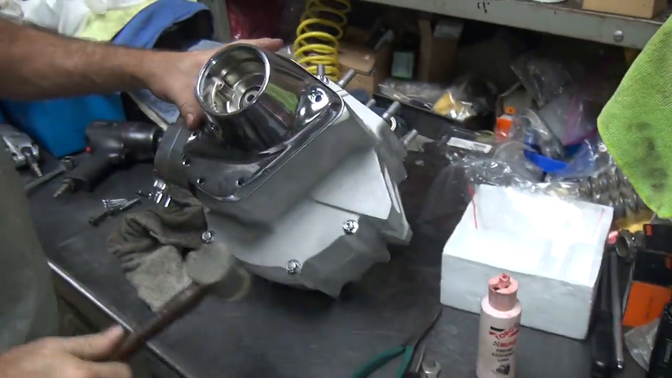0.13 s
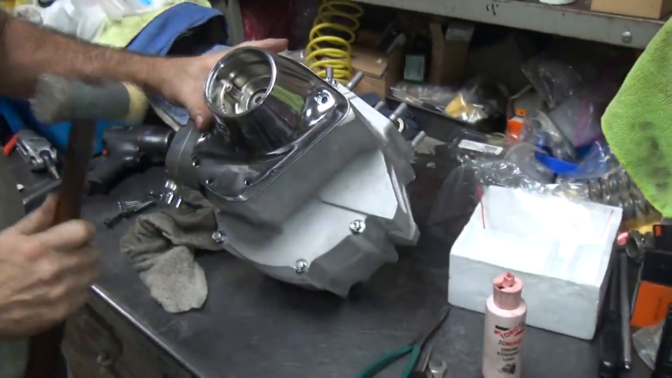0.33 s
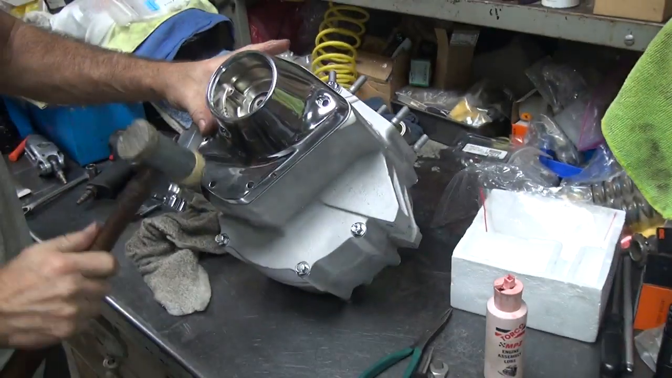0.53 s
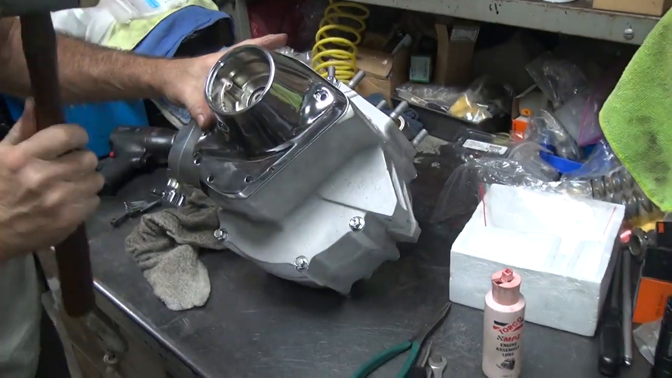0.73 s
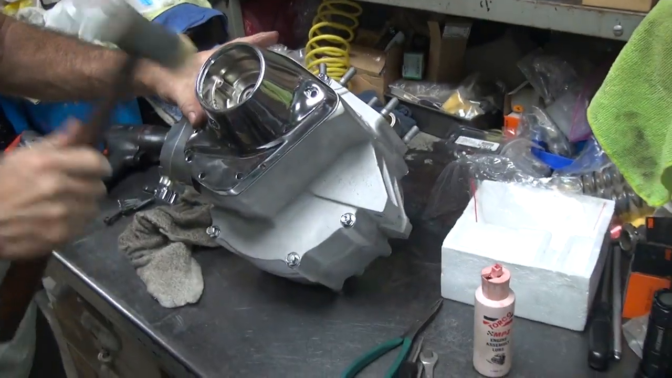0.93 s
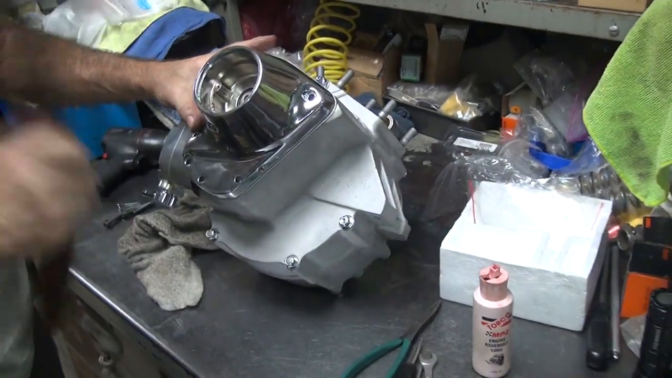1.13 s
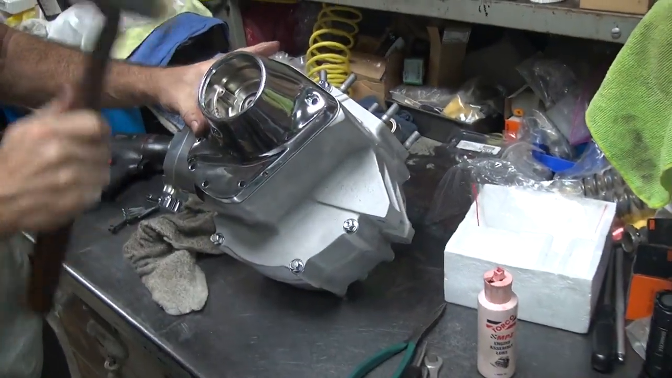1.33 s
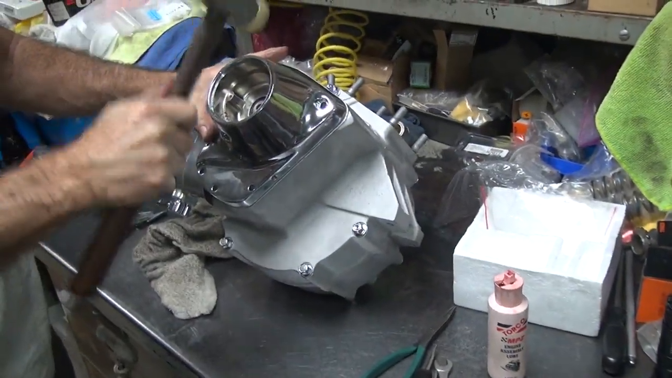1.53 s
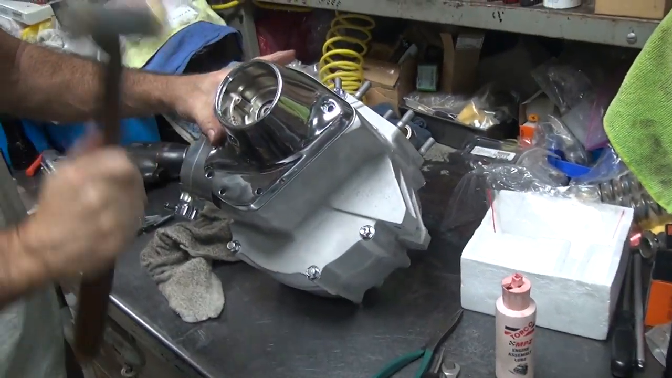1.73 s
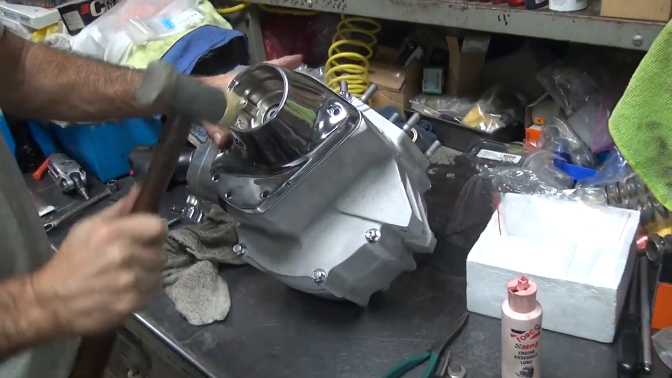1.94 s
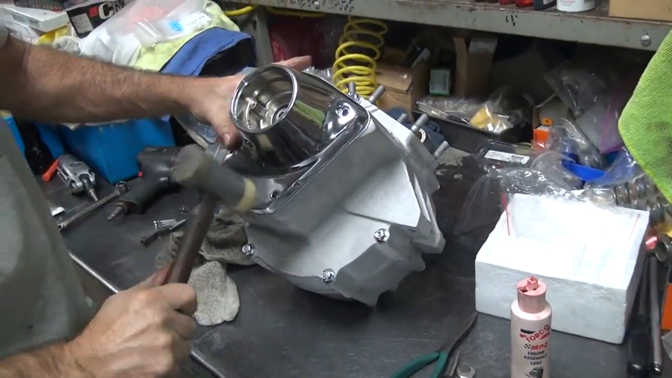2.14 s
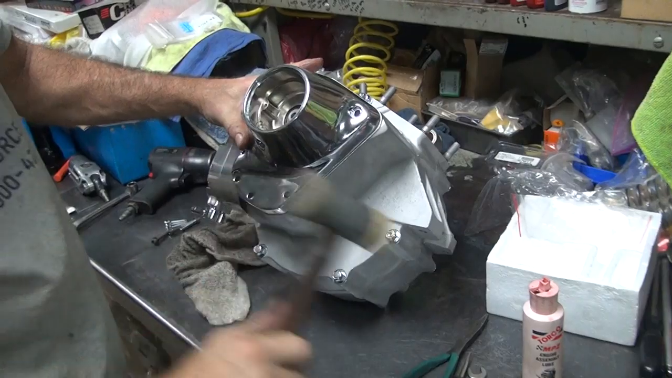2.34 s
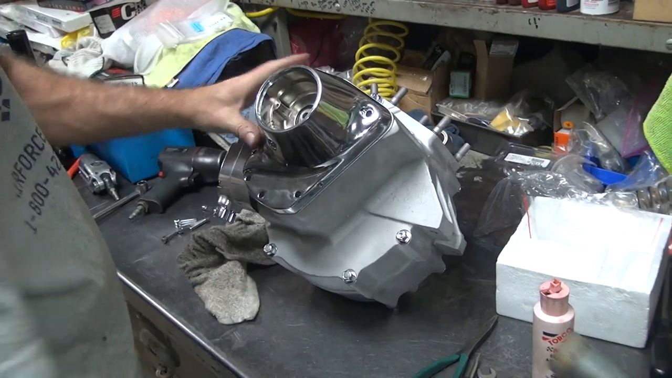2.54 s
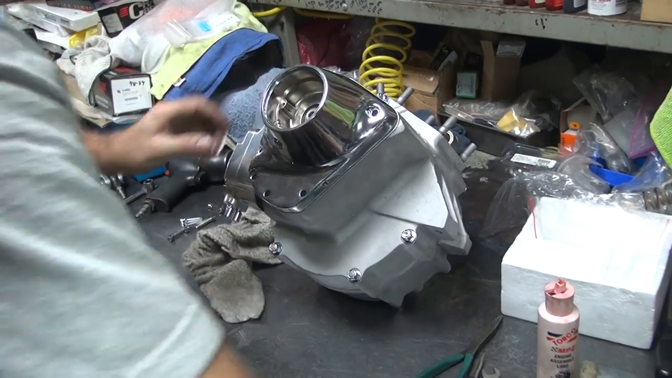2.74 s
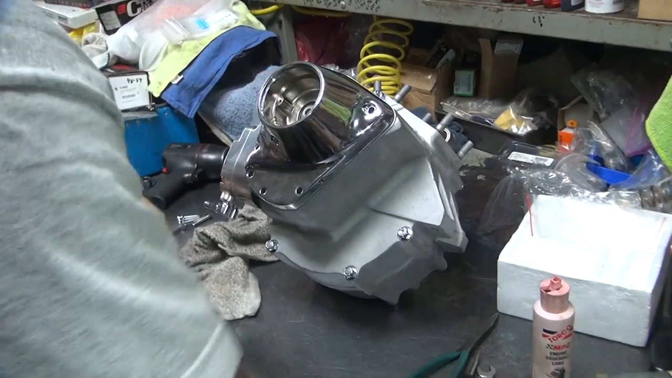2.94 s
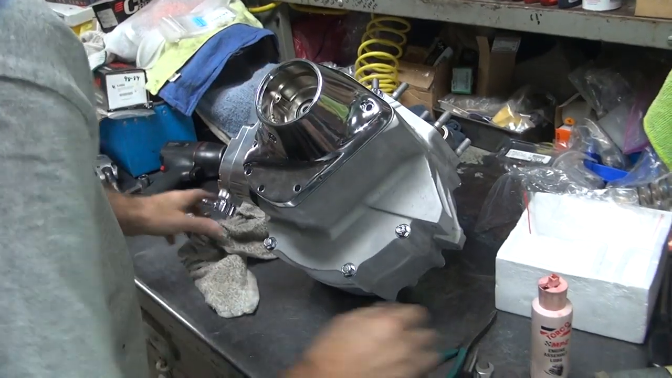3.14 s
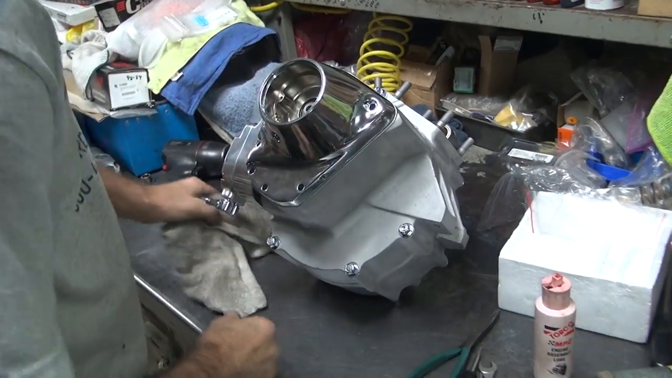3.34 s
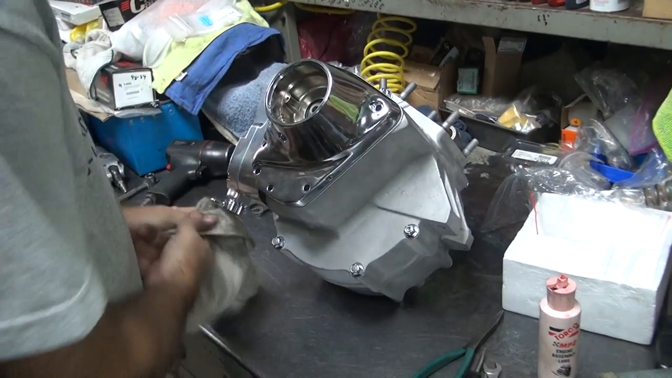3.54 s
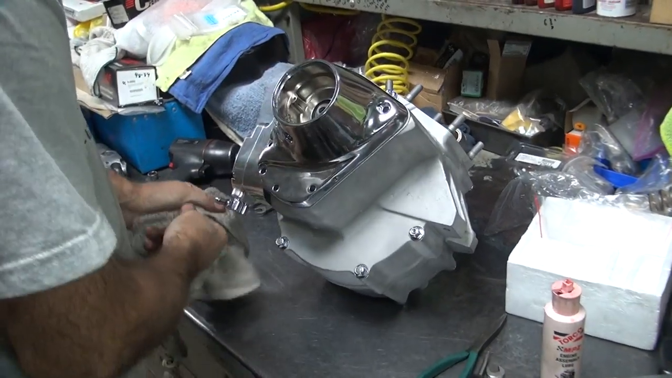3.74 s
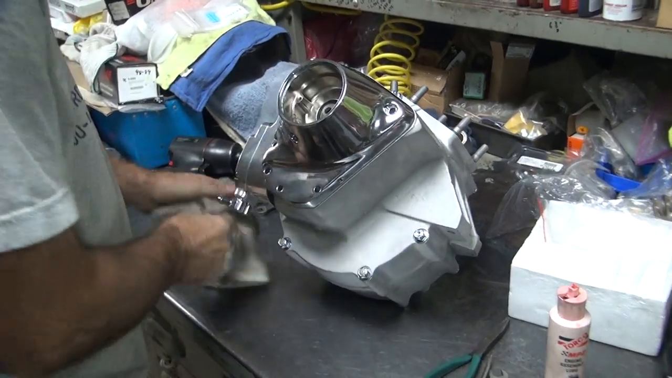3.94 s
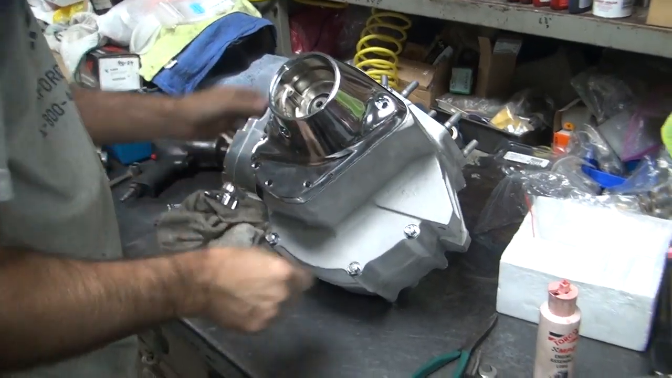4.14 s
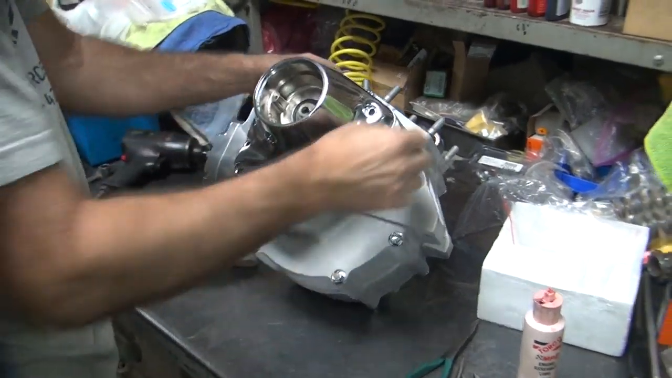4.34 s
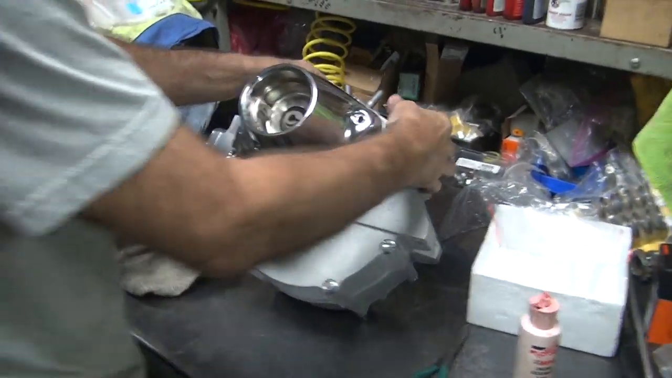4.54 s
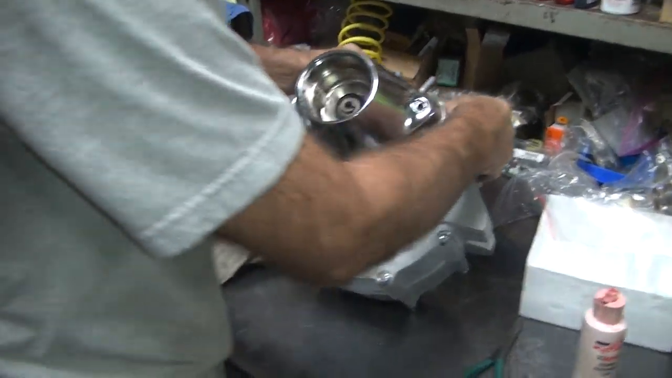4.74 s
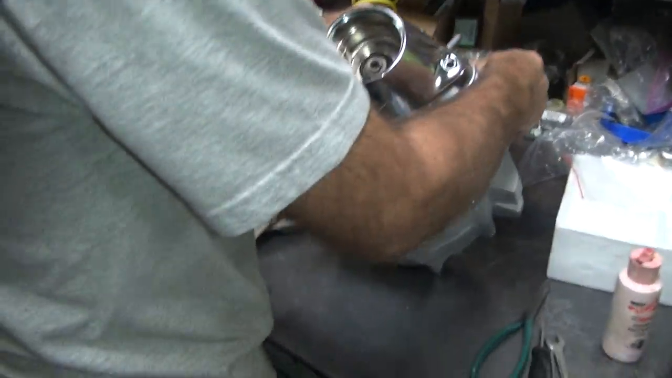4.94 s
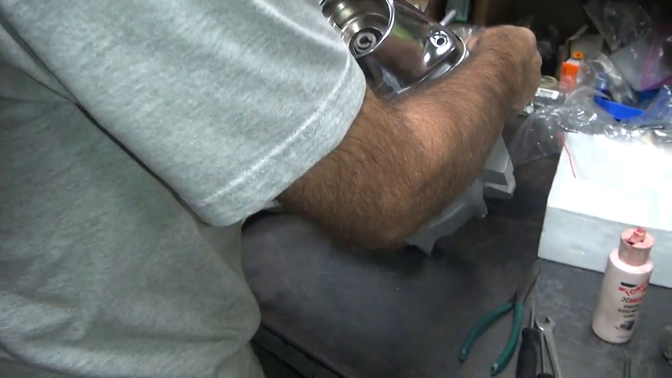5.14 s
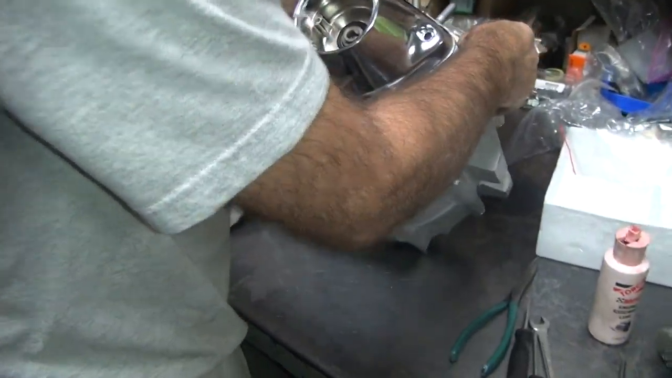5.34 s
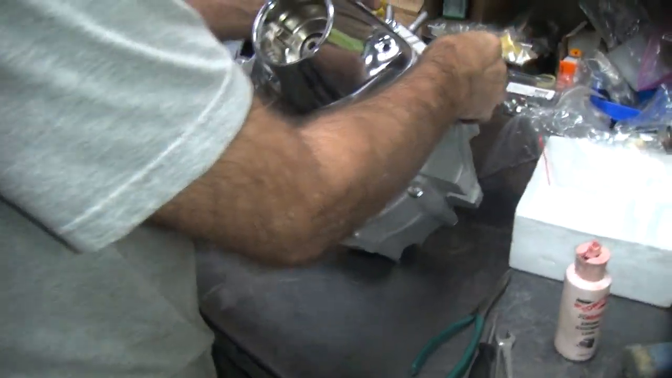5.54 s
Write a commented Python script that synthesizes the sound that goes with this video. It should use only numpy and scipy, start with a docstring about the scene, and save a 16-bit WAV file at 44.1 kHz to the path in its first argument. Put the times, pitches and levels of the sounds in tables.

```python
"""A motorcycle crankcase slides on a steel bench in a small workshop, with light hand taps, hiss and ticks.
Six mallet blows then tap a metal cover onto it: noise and fading sine tones make the thud, clang and ping.
After a few faint gliding chirps the mallet drops among loose tools, which rattle and ring on.
Hands wipe on a rag (hiss that swells and fades), then take hold of the case and rock it with knocks and clinks.
Air and mains hum run throughout; a limiter flattens every loud blow, so the room swells up just behind it."""
import sys
import numpy as np
from scipy import signal
from scipy.fft import rfft, irfft, next_fast_len
from scipy.io import wavfile
from scipy.ndimage import uniform_filter1d, minimum_filter1d

SR = 44100
rng = np.random.default_rng(int(sys.argv[2]) if len(sys.argv) > 2 else 0)


def int16_out(signal):
    """Quantize to a 16-bit WAV file."""
    q = np.round(np.clip(np.atleast_2d(signal).T, -1, 1) * 32767)
    wavfile.write(sys.argv[1], SR, q.astype(np.int16))


N = 246607

# All dB values are relative strengths. A t60 is the time a sound takes to fade by 60 dB.
# steady workshop air: (frequency [Hz], strength per Hz [dB])
AIR_COLOUR = [(18, -26.5), (30, 2), (118, 1), (165, 0), (295, 0), (486, -10), (1160, -11), (2060, -17),
              (2350, -17), (6380, -20), (16000, -26)]
AIR_DB = -67.5
# mains hum: (frequency [Hz], level [dB])
HUM = [(60, -94.5), (120, -79)]

# loudness of the case sliding on the bench, before it stops: (time [s], level [dB])
SLIDE_LEVEL = [(0, -52.5), (.05, -55), (.16, -60.5), (.26, -57), (.3, -55.5)]
# tone of that scraping: (frequency [Hz], strength per Hz [dB])
SLIDE_COLOUR = [(80, -6), (400, 7), (900, 3), (1550, -5.5), (1950, 9.5), (2600, -1.5), (4100, 1.5),
                (5000, -3), (10000, -1.5), (16000, -10.5)]
SLIDE_STOP_S, SLIDE_RELEASE_S = 0.28, 0.038

# strokes of sleeve, rag and palm; the length runs between the points where speed is 37% of its peak:
# (time of fastest motion [s], length [s], level [dB], brightness [dB])
STROKES = [(0.412, 0.75, -68, -2.5), (2.89, 0.56, -63, -6), (3.19, 0.25, -67.5, -4), (3.646, 0.11, -76, 6),
           (3.864, 0.21, -72, 9), (4.096, 0.2, -64, -15), (4.27, 0.17, -58.5, -6), (4.46, .12, -63.5, -3),
           (4.635, 0.21, -68, 5), (4.884, 0.23, -59.5, -12.5), (5.19, .22, -60, -18), (5.47, 0.4, -68, -5)]
# tone of the stroking hiss: (frequency [Hz], strength per Hz [dB])
RUSTLE_COLOUR = [(80, -30.5), (400, 9), (900, 4), (1600, 2), (2000, 2), (2600, -2.5), (4500, -2.5),
                 (7000, -1.5), (10000, -3), (16000, -3.5)]
SWELL_SHAPE = 1.42  # a stroke gathers and loses speed in a bell: 1 = pointed, 2 = round

# workshop echo, t60 before the length factor: (frequency [Hz], strength [dB], t60 [s])
ROOM = [(60, -1.5, 0.35), (247, 0.5, 0.53), (930, -6, 0.52), (2910, -1, 0.42), (6940, 2, 0.3),
        (15000, 8.5, 0.19)]

# light dry taps of hands on the cover: (time [s], force [dB])
TAPS = [(0.026, -37.5), (0.219, -42.5), (4.002, -45.5), (4.81, -43.5), (5.121, -44)]
# small ticks of the grip and loose parts: (time [s], force [dB], crack [dB])
TICKS = [(0.379, -48.5, -13), (0.393, -51.5, -9), (0.473, -54.5, -15.5), (2.674, -50.5, -18),
         (2.707, -46, -14.5), (3.611, -60, -8), (4.196, -45.5, -14), (4.202, -42.5, -14),
         (4.21, -40.5, -9.5), (4.219, -44.5, -11.5), (5.12, -62.5, -7)]
# the case knocking on the bench: (time [s], force [dB], hardness [dB], thump of the edge that lands [Hz])
KNOCKS = [(4.2287, -27.5, 1, 172), (4.241, -29, -14, 180), (4.256, -34, 5, 300), (4.323, -40, -8, 283),
          (4.430, -29.5, -1, 224), (4.468, -32, -9.5, 225), (4.481, -34, 2, 241), (4.527, -50, 4, 260),
          (5.327, -40, -8, 200), (5.402, -36.5, 3.5, 221)]
# metal clinks as the case is tipped: (time [s], force [dB], thud [dB], crack [dB])
CLINKS = [(5.3433, -34.5, 2, 2.5), (5.558, -44, 11, -10)]
# six mallet blows: (time [s], force [dB], thud [dB], clang [dB], crack [dB],
# ring length factor [1], ping of the spot struck [Hz], ping level [dB])
BLOWS = [(0.5449, -19.5, -6.5, -2, -1.5, 1.17, 1060, 1), (0.9090, -12.5, 1, 2, 3, 0.94, 436, 11.5),
         (1.2592, -13.5, -1, -2, 4, 1.036, 1000, 5), (1.584, -14, 0, -1.5, 5, 0.88, 3090, -1.5),
         (1.8672, -13.5, -0.5, -7.5, 1, 0.81, 3010, 1), (2.1717, -22.5, 3.5, 2, 5, 0.7, 2990, 2)]
# the dropped mallet bouncing among tools: (time [s], force [dB], thud [dB], crack [dB])
CLATTER = [(2.918, -14.5, 3.5, 1.5), (2.946, -31, -2, 13), (2.979, -7.5, 3, -8), (2.984, -10.5, -1.5, 4),
           (3.004, -7.5, -1.5, 2.5), (3.032, -23.5, 10, 9.5), (3.0825, -17.5, -1, 2.5),
           (3.114, -20, 0.5, -1.5), (3.13, -30, 1, -8), (3.159, -28, -10, -9)]

# The next six describe the dense ringing of each struck thing, t60 before the length factor.
# hand-tapped cover: (frequency [Hz], strength per Hz [dB], t60 [s])
TAP_BODY = [(81, -5.5, .04), (252, 5, 0.04), (480, 3.5, 0.058), (990, -8.5, 0.021), (2200, -14, .04),
            (4500, -31, 0.034), (13000, -46, .02)]
# small loose parts: (frequency [Hz], strength per Hz [dB], t60 [s])
SMALL_BODY = [(40, -33, 0.034), (200, -2, 0.033), (1015, -13, .03), (3040, -1.5, 0.019),
              (7130, -0.5, 0.026), (15100, -6.5, .02)]
# bench under a knock: (frequency [Hz], strength per Hz [dB], t60 [s])
BENCH_BODY = [(30, -34, 0.027), (59.7, -30, 0.11), (126, -11.5, 0.041), (185.4, 6.5, 0.038),
              (330, -3, 0.29), (550, -14, 0.13), (930, -23.5, 0.25), (2000, -28, 0.091),
              (5000, -41.5, 0.13), (15000, -57, 0.019)]
# clinking metal rim: (frequency [Hz], strength per Hz [dB], t60 [s])
RIM_BODY = [(80, -14, 0.35), (333, 2.5, 0.16), (980, 2, 0.18), (1860, 1.5, 0.25), (3360, -11, 0.069),
            (5560, -8, 0.022), (15000, -25, 0.038)]
# case under the mallet: (frequency [Hz], strength per Hz [dB], t60 [s])
CASE_BODY = [(50, -4, 0.18), (164, 2, 0.12), (318, 6, 0.11), (510, -0.5, 0.34), (617, -5.5, 0.22),
             (857, 4, 0.24), (1410, 0.5, 0.23), (2480, -3, 0.19), (3550, -9.5, 0.2), (6400, -9, 0.17),
             (9500, -15.5, 0.13), (12100, -21, 0.15), (17000, -37.5, 0.2)]
# rattling tools: (frequency [Hz], strength per Hz [dB], t60 [s])
TOOLS_BODY = [(51.4, -11.5, 0.075), (162, -3, 0.29), (310, -2, 0.42), (635, -2.5, 0.22), (1100, -2.5, 0.33),
              (2020, -4.5, 0.31), (3510, -8, 0.32), (5360, 0.5, 0.082), (8700, -9, 0.17),
              (12200, -17, 0.12), (16000, -25.5, 0.085)]

# The next five are modes: single tones at which a thing likes to ring.
# case, before the blow's own level and length changes: (frequency [Hz], level [dB], t60 [s])
CASE_MODES = [(285.3, -20.5, 0.19), (326, -17.5, 0.11), (421, -14, 0.47), (427, -12, 0.22),
              (497, -13, 0.33), (527.5, -14.5, 0.096), (659, -17.5, 0.37), (830, -16, 0.29),
              (869, -29, 0.72), (954, -10.5, 0.31), (1072, -33.5, 0.52), (1095, -21, 0.63),
              (1340, -11.5, 0.38), (2030, -19.5, 0.34), (2210, -24.5, 0.35)]
# case knocking on the bench: (frequency [Hz], level [dB], t60 [s])
KNOCK_MODES = [(222, -21, 0.065), (277, -7.5, 0.13), (322.3, -12, 0.23), (467, -16.5, 0.073)]
# clinking rim: (frequency [Hz], level [dB], t60 [s])
RIM_MODES = [(1106, -7.5, 0.13), (1298, -9, 0.12), (1700, -26, 0.33), (1836, -8, 0.24), (2020, -18.5, .28),
             (2410, -18, 0.059)]
# steel bench: (frequency [Hz], level [dB], t60 [s])
BENCH_MODES = [(59.7, -39, 1.9), (104.9, -20, 0.31), (108.6, -44, 2.8), (118.7, -42, 2.8),
               (122.3, -37.5, 5), (147.5, -30, 0.52), (174, -24.5, 0.57), (205, -29, 0.45)]
# tools under the dropped mallet: (frequency [Hz], level [dB], t60 [s])
TOOL_MODES = [(60, -30, 0.59), (85.8, -16.5, 0.4), (121, -31.5, 0.5), (193.7, -23, 0.96),
              (283.7, -11, 0.34), (305, -21, 0.35), (443.4, -14.5, 0.272), (820, -24, 0.72),
              (940, -29, 0.36), (1150, -48, 1.9), (2067, -32.5, 1.13)]

# faint chirps and squeaks: (time [s], duration [s], start frequency [Hz], end frequency [Hz], level [dB])
CHIRPS = [(2.405, .022, 1000, 1150, -63), (2.552, .022, 1050, 1250, -65), (2.620, .018, 1720, 1660, -70),
          (2.70, .21, 5950, 6700, -79)]
# reverberation that differs between the microphones: (frequency [Hz], strength [dB])
WIDTH = [(40, -1), (120, 2), (500, -1.5), (2000, -1.5), (4500, -4), (8000, 8), (10500, 2.5), (13000, -14)]
# the left microphone is thinner in the bass: (frequency [Hz], gain [dB])
LEFT_PORT = [(25, -2), (60, -3), (125, 0.7), (250, 0)]

CONTACT_DB, CONTACT_PER_FORCE = -30.5, -1.73  # a light blow is mostly contact click, a heavy one mostly ring
LOW_MODES_DB, LOW_PER_THUD = -3, 0.96  # the low modes follow the thud
HIGH_MODES_DB, HIGH_PER_CLANG = -4.5, 1.3  # the high modes follow the clang
PING_T60_S = 0.033  # the metal right under the mallet rings only briefly
THUMP_DB, THUMP_T60_S = -3.5, 0.06
BENCH_DB, BENCH_PER_THUD = 3.5, 0.3  # so much of a blow reaches the bench
LAST_RING, SETTLE_S = 0.27, 0.052  # the bounces ring ever shorter, towards this share of the first
HOLD_S, RELEASE_DB_PER_S = 0.005, 800  # limiter: window centred on each peak, then speed of recovery
EDGE_HZ = 16300  # top of the band


def amp(db):
    """Turns decibels into a plain multiplier."""
    return 10 ** (np.asarray(db) / 20)


def unit(x):
    """Scales a signal to an average (rms) strength of 1."""
    return x / np.sqrt(np.mean(x ** 2) + 1e-20)


def read(points, hz, axis=1):
    """Reads one column of a table at any frequency, joining its points on a log-frequency axis."""
    columns = np.transpose(points)
    return np.interp(np.log(hz + 1), np.log(columns[0] + 1), columns[axis])


def add(mix, s, sound):
    """Mixes a sound in at time s."""
    part = mix[max(round(s * SR), 0):][:len(sound)]
    part += sound[:len(part)]


def colour(x, *spectra):
    """Filters x with the first spectrum, scaled to keep mean power, then tilts it by any others."""
    size = next_fast_len(len(x), real=True)
    hz = np.fft.rfftfreq(size, 1 / SR)
    tilt_db = sum(read(points, hz) for points in spectra[1:])
    gain = unit(amp(read(spectra[0], hz))) * amp(tilt_db)
    cepstrum = irfft(np.log(gain + 1e-6), size)
    cepstrum[1:] *= 2 * (np.arange(1, size) < size / 2)  # minimum phase: nothing sounds before its cause
    response = np.exp(rfft(cepstrum))
    return irfft(rfft(x, size) * response, size)[:len(x)]


def fade(x, table, length=1):
    """Lets each frequency band die away at its own t60, times the length factor."""
    hz, t, bands = signal.stft(x, SR, nperseg=256)
    t60 = np.maximum(read(table, hz, axis=2) * length, 1e-3)[:, None]
    decay = np.exp(-np.log(1000) * t / t60)
    return signal.istft(bands * decay, SR, nperseg=256)[1][:len(x)]


def ring(modes, length=1, size=SR // 2):
    """Fading sine tones started by one blow; neighbouring modes swing in opposite directions."""
    t = np.arange(size) / SR
    out = np.zeros(size)
    for k, (hz, db, t60) in enumerate(modes):
        decay = np.exp(-np.log(1000) * t / max(t60 * length, 1e-3))
        out += (-1) ** k * amp(db) * np.sin(2 * np.pi * hz * t) * decay
    return out


def grainy(size, grain_db):
    """Noise whose level jumps every few milliseconds, as surfaces catch and chatter."""
    catches = unit(uniform_filter1d(rng.standard_normal(size), size=110))
    return unit(rng.standard_normal(size) * amp(grain_db * catches))


def strike(body, thud_db, clang_db, crack_db, length, contact_db=-10, contact_s=0.00061, chatter_db=1):
    """A sharp contact, then countless close modes; the spot hit weights low, middle and high ones."""
    t = np.arange(SR // 2) / SR
    # a harder contact reaches further into the treble
    spot = [(350, thud_db), (1000, clang_db), (1800, clang_db), (6500, crack_db), (13000, 1.5 * crack_db)]
    contact = 1 + amp(contact_db) * np.exp(-t / max(contact_s, 1e-4))
    ringing = fade(grainy(len(t), chatter_db), body, length)
    return colour(ringing * contact, body, spot)


def air():
    """Steady workshop air, made of filtered noise, with a faint mains hum of sine tones."""
    t = np.arange(N) / SR
    hum = sum(amp(db) * np.sqrt(2) * np.sin(2 * np.pi * hz * t) for hz, db in HUM)
    return amp(AIR_DB) * unit(colour(rng.standard_normal(N), AIR_COLOUR)) + hum


def slide():
    """The case scrapes softly over the bench; the hiss of friction dies away as it stops."""
    t = np.arange(N) / SR
    level = amp(np.interp(t, *np.transpose(SLIDE_LEVEL)))
    release = np.exp(-np.maximum(t - SLIDE_STOP_S, 0) / SLIDE_RELEASE_S)
    return level * release * colour(grainy(N, grain_db=0.6), SLIDE_COLOUR)


def rustle():
    """Friction hiss of skin and cloth: every stroke swells and fades, some brighter than others."""
    t, out = np.arange(N) / SR, np.zeros(N)
    hiss = colour(grainy(N, grain_db=1.8), RUSTLE_COLOUR)
    body = signal.sosfilt(signal.butter(1, 3000, fs=SR, output="sos"), hiss)
    treble = hiss - body
    for s, length, db, bright_db in STROKES:
        speed = np.exp(-abs(2 * (t - s) / length) ** SWELL_SHAPE)
        out += amp(db) * speed * (body + amp(bright_db) * treble)
    return out


def room(x, delay_s, length, turns_per_s=11, count=4):
    """Dense reflections after a short delay; four sets of them fade in and out in turn, at a steady rate."""
    out, turn = np.zeros(N), np.arange(N) / SR * turns_per_s
    for k in range(count):
        tail = fade(colour(rng.choice([-1., 1.], SR // 2), ROOM), ROOM, length)
        tail = tail / np.linalg.norm(tail)
        tail = np.concatenate([np.zeros(round(abs(delay_s) * SR)), tail])
        # the paths take turns, and the squares of their shares sum to 1
        share = np.maximum(np.cos(2 * np.pi * (turn + k / count)), 0)
        out += signal.oaconvolve(x * share, tail)[:N]
    return out


def handling(crack_per_hardness=0.34):
    """Knocks, taps, clinks and ticks as things are gripped and moved: short bursts of fading noise."""
    out = np.zeros(N)
    for s, force_db, hard_db, _ in KNOCKS:
        knock = strike(BENCH_BODY, thud_db=-4.5, clang_db=hard_db, crack_db=crack_per_hardness * hard_db,
                       length=0.81, contact_db=2.5)
        add(out, s, amp(force_db) * knock)
    for s, force_db in TAPS:
        tap = strike(TAP_BODY, thud_db=-2.5, clang_db=-4, crack_db=-2, length=0.76, contact_db=-17)
        add(out, s, amp(force_db) * tap)
    for s, force_db, thud_db, crack_db in CLINKS:
        clink = strike(RIM_BODY, thud_db, clang_db=-2, crack_db=crack_db, length=0.99, contact_db=-24)
        add(out, s, amp(force_db) * clink)
    for s, force_db, crack_db in TICKS:
        tick = strike(SMALL_BODY, thud_db=5, clang_db=4, crack_db=crack_db, length=1.9, contact_db=5.5)
        add(out, s, amp(force_db) * tick)
    return out


def mallet():
    """Each blow drives the cover home: a contact click and the dense ringing of the case."""
    out = np.zeros(N)
    for s, force_db, thud_db, clang_db, crack_db, length, _, _ in BLOWS:
        contact_db = CONTACT_DB + CONTACT_PER_FORCE * force_db
        blow = strike(CASE_BODY, thud_db, clang_db, crack_db, length,
                      contact_db=contact_db, contact_s=0.0019, chatter_db=3.5)
        add(out, s, amp(force_db) * blow)
    return out


def clear_modes(rim_db=3):
    """The strongest modes stand out of blows, knocks and clinks; the spot hit adds its ping or thump."""
    out = np.zeros(N)
    for s, force_db, thud_db, clang_db, _, length, ping_hz, ping_db in BLOWS:
        low_db = LOW_MODES_DB + LOW_PER_THUD * thud_db
        high_db = HIGH_MODES_DB + HIGH_PER_CLANG * clang_db
        modes = [(hz, db + (low_db if hz < 600 else high_db), t60) for hz, db, t60 in CASE_MODES]
        ping = ring([(ping_hz, ping_db, PING_T60_S)])
        add(out, s, amp(force_db) * (ring(modes, length) + ping))
    for s, force_db, _, thump_hz in KNOCKS:
        thump = ring([(thump_hz, THUMP_DB, THUMP_T60_S)])
        add(out, s, amp(force_db) * (ring(KNOCK_MODES) + thump))
    for s, force_db, *_ in CLINKS:
        add(out, s, amp(force_db + rim_db) * ring(RIM_MODES))
    return out


def bench_drone():
    """Blows and clinks pass through the case and leave the steel bench droning on its own modes."""
    out, drone = np.zeros(N), ring(BENCH_MODES, size=N)
    for s, force_db, thud_db, *_ in BLOWS:
        add(out, s, amp(force_db + BENCH_DB + BENCH_PER_THUD * thud_db) * drone)
    for s, force_db, *_ in CLINKS:
        add(out, s, amp(force_db) * drone)
    return out


def chirps(waver=0.027):
    """Short tones that glide from one pitch to another with a quick random waver."""
    out = np.zeros(N)
    for s, duration, start_hz, end_hz, db in CHIRPS:
        count = round(duration * SR)
        wobble = unit(uniform_filter1d(rng.standard_normal(count), size=40))
        hz = np.linspace(start_hz, end_hz, count) * (1 + waver * wobble)
        tone = np.sin(2 * np.pi * np.cumsum(hz) / SR)
        add(out, s, amp(db) * unit(tone * signal.windows.tukey(count, 0.5)))
    return out


def clatter(clang_per_thud=0.31):
    """The mallet lands and bounces while the tools rattle, each bounce deader than the last."""
    out = np.zeros(N)
    first_s = CLATTER[0][0]
    for s, force_db, thud_db, crack_db in CLATTER:
        length = LAST_RING + (1 - LAST_RING) * np.exp((first_s - s) / SETTLE_S)
        hit = strike(TOOLS_BODY, thud_db, clang_per_thud * thud_db, crack_db, length,
                     contact_db=-17.5, contact_s=0.0058)
        add(out, s, amp(force_db) * hit)
    return out


def tool_ring(tools_db=-12):
    """A few steel tools sing on, as fading sine tones, after the mallet lands on them."""
    out = np.zeros(N)
    add(out, CLATTER[0][0], amp(tools_db) * ring(TOOL_MODES, size=2 * SR))
    return out


def scene():
    """Shelves answer at once, the walls later; the close microphone pair hears almost the same."""
    blows, drop = mallet(), clatter()
    hands = handling() + slide() + rustle() + chirps()
    near = blows + drop + hands
    shelves = room(amp(0.5) * blows + amp(-7) * drop + amp(-10.5) * hands, delay_s=0.0098, length=0.11)
    walls = room(amp(-8) * blows + amp(-9.5) * drop + amp(-13) * hands, delay_s=0.014, length=1)
    mid = near + shelves + walls + clear_modes() + bench_drone() + tool_ring() + air()
    # added on the left and subtracted on the right, so it widens the stereo picture
    side = amp(-15) * colour(room(near, delay_s=0.0005, length=0.26) + air(), WIDTH)
    left = amp(1.46) * colour(mid + side, LEFT_PORT)
    right = amp(2.5) * (mid - side)
    return np.array([left, right])


def record(dry, low_cut_hz=46, ceiling_db=-10):
    """A low cut; a look-ahead limiter that ducks just before each peak and recovers quickly; a treble cut."""
    x = signal.sosfilt(signal.butter(2, low_cut_hz, "high", fs=SR, output="sos"), dry)
    peak_db = 20 * np.log10(abs(x).max(0) + 1e-9)  # the louder channel ducks both
    over_db = np.maximum(peak_db - ceiling_db, 0)
    held_db = -minimum_filter1d(-over_db, size=max(round(HOLD_S * SR), 1))
    # the duck may shrink only as fast as this steady fall
    fall = np.arange(N) / SR * RELEASE_DB_PER_S
    duck_db = uniform_filter1d(np.maximum.accumulate(held_db + fall) - fall, size=50)
    low_pass = signal.firwin(255, EDGE_HZ, window=("kaiser", 8), fs=SR)
    return signal.oaconvolve(x * amp(-duck_db), low_pass[None], "same")


dry = scene()
out = record(dry)
int16_out(out)
```